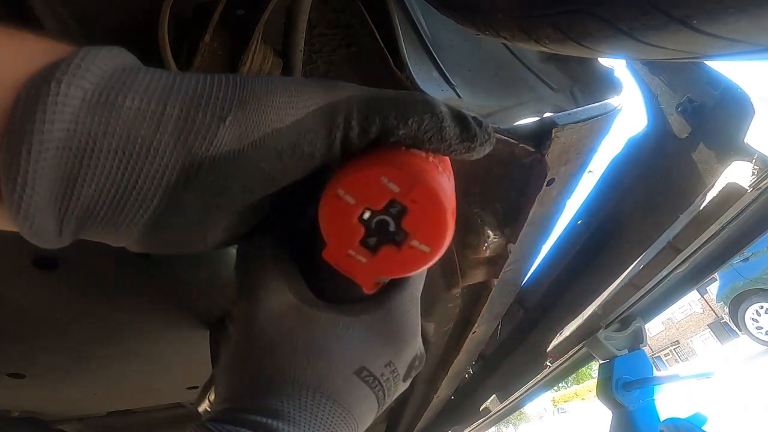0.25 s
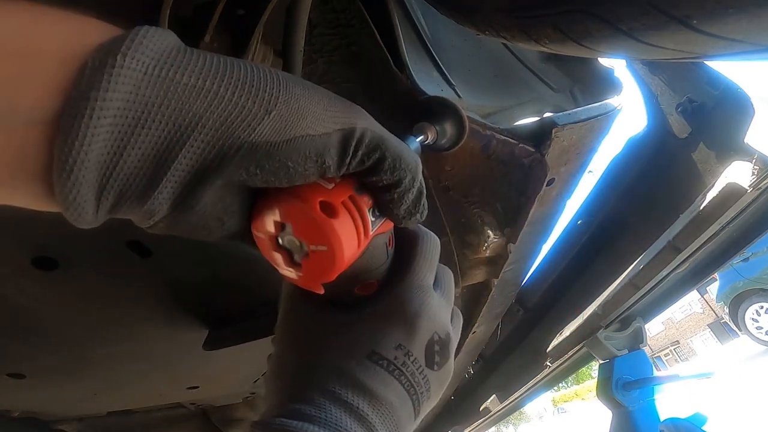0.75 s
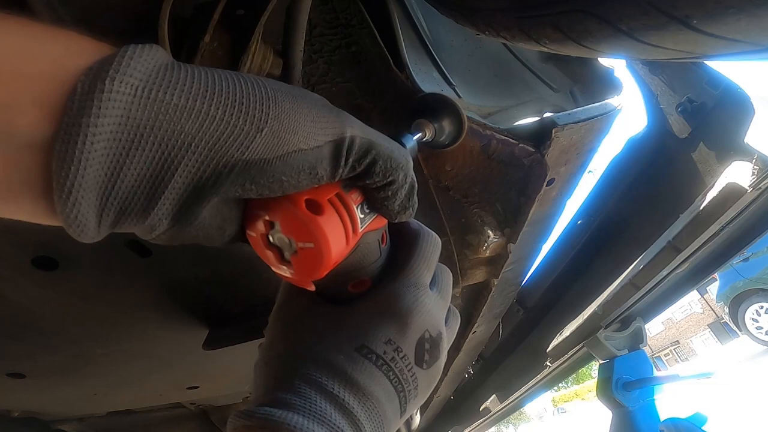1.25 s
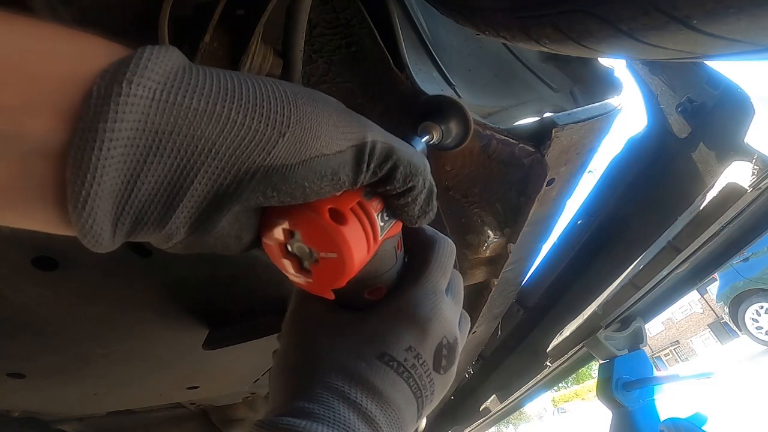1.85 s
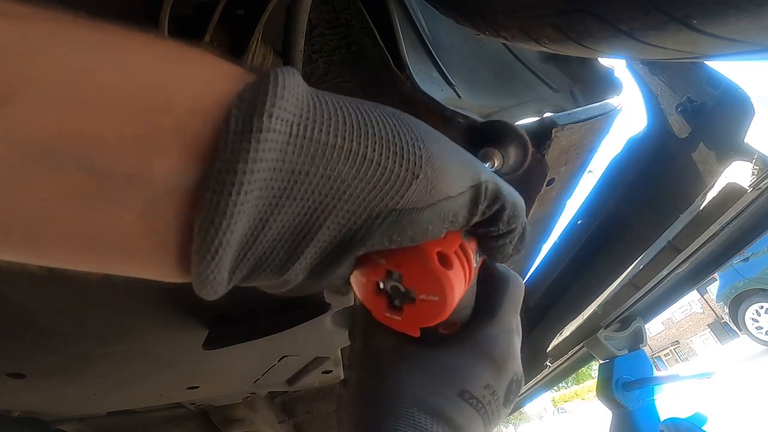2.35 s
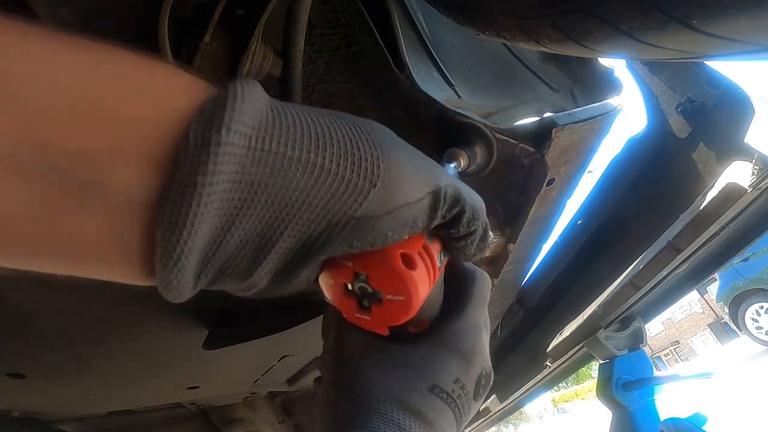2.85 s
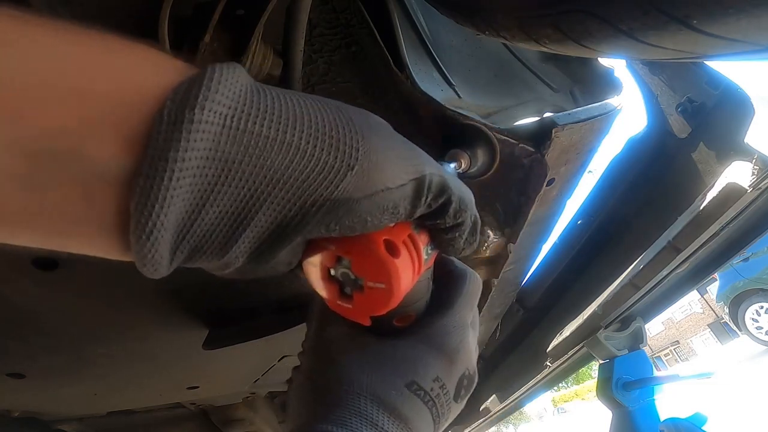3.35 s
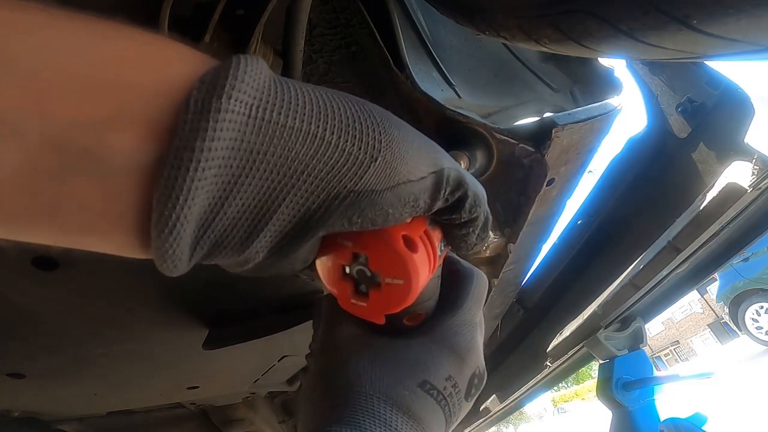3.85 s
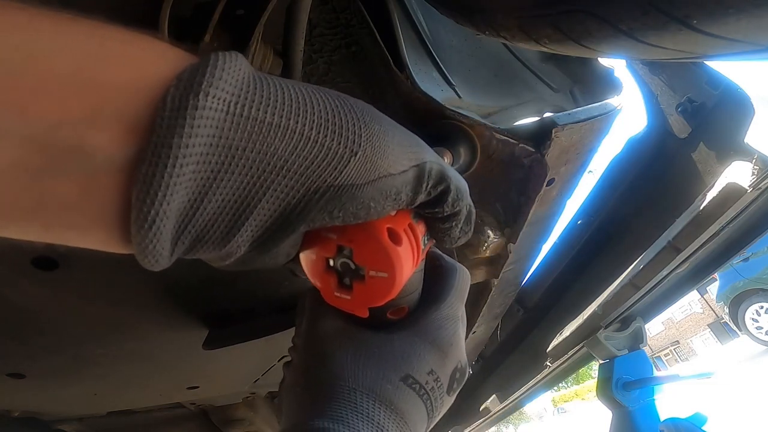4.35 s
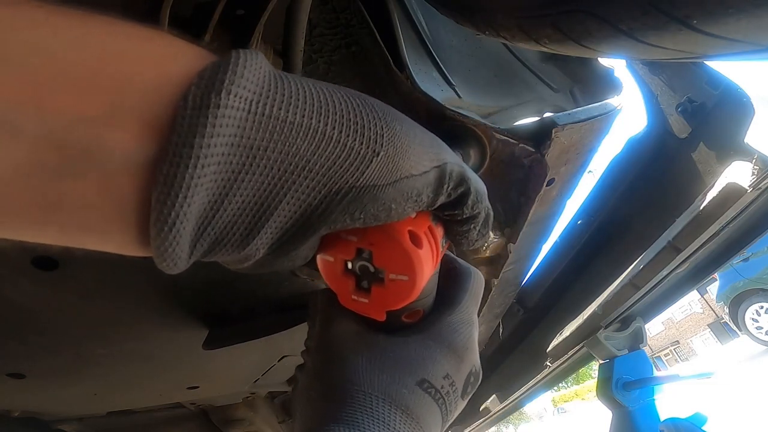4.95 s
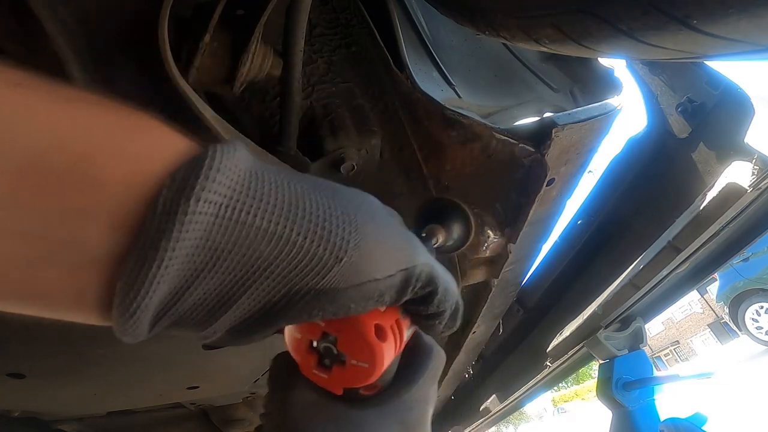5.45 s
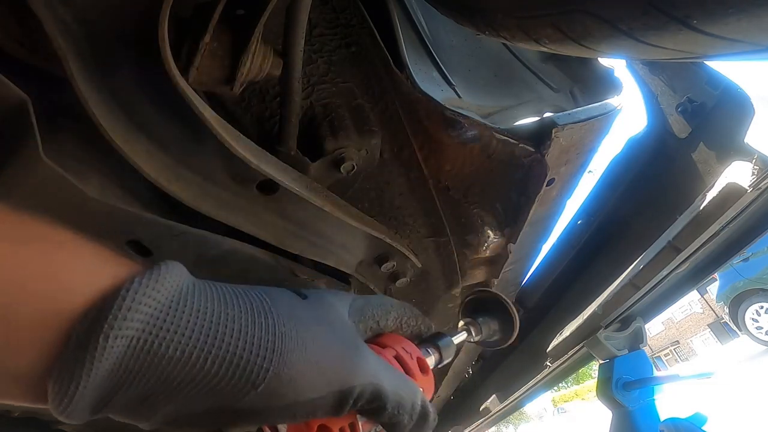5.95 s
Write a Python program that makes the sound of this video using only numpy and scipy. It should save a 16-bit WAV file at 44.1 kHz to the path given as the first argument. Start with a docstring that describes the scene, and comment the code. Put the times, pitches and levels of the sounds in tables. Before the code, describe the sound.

Heard up close in a quiet garage, a small cordless grinder strips rust from a car's steel underbody. Soft bumps from the hands come first, under a continuous rasping whine and a ringing panel. The pitch sags again and again as the pad is pressed in, bringing brief shrill squeals. Finally the tool spins down with a quick scrape and thud, followed by light metal ticks and one sharp click.

```python
"""A wavering, gritty whine: a cordless die grinder works an abrasive pad over the rusty underside of a car.
Each turn shakes the tool and forces the panel to ring at harmonics (orders) of the shaft speed, which sags
under load. Grit hisses, a bracket squeals, the motor drive whistles and hands knock, over quiet garage air.
Near the end the trigger is let go, the pad scrapes to a halt, and the tool ticks against metal."""
import sys
import numpy as np
from scipy import signal
from scipy.fft import rfft, irfft
from scipy.io import wavfile
from scipy.ndimage import uniform_filter1d, map_coordinates

SR = 44100
rng = np.random.default_rng(int(sys.argv[2]) if len(sys.argv) > 2 else 0)


def master_out(mix):
    """Clip the mix to full scale and print it as 16-bit PCM to the path in sys.argv[1]."""
    frames = np.transpose(np.atleast_2d(mix))
    ceiling = np.clip(frames, -1, 1)
    pcm = np.round(ceiling * 32767).astype(np.int16)
    wavfile.write(sys.argv[1], SR, pcm)


N = 273155
HOP = 128  # samples per control frame
T, FRAMES = np.arange(N) / SR, np.arange(N // HOP + 9) * HOP / SR
SIDES = np.array([.5, -.5])  # left and right shares of a difference between the ears
ORDERS = np.arange(1, 65)
RELEASE_S = 5.607  # the trigger is let go


def gain_of(db):
    """Amplitude ratio of a level in decibels."""
    return 10 ** (np.asarray(db) / 20)

def unit_rms(x):
    """Normalisation to unit mean power."""
    return x / np.sqrt(np.mean(abs(x) ** 2) + 1e-20)

def unit_power(gains):
    """Normalisation of each frame of orders to a total power of 1."""
    return gains / np.sqrt((gains ** 2).sum(axis=1, keepdims=True) + 1e-20)

def curve(points, t):
    """Linear interpolation in time."""
    return np.interp(t, *np.transpose(points))

def at_hz(points, hz):
    """Interpolation on a logarithmic frequency axis."""
    f, value = np.transpose(points)
    return np.interp(np.log(hz + 1), np.log(f + 1), value)

def bells(centres, widths):
    """Gaussian pulses at frame rate, one column per event; a width is a standard deviation."""
    return np.exp(-.5 * ((FRAMES[:, None] - centres) / widths) ** 2)

def drift(hz, count=1):
    """Random fluctuation: columns of low-passed noise at frame rate, rms 1."""
    b, a = signal.butter(1, hz * 2 * HOP / SR)
    slow = signal.filtfilt(b, a, rng.standard_normal((3 * len(FRAMES), count)), axis=0)
    return unit_rms(slow[len(FRAMES):2 * len(FRAMES)])

# Likeness of the two ears. Each row: frequency in Hz, coherence from 0 to 1.
COHERENCE = [(30, 0.8), (200, 0.96), (640, 0.77), (1400, 0.98), (3100, 0.71), (6800, 0.16), (15000, 0)]
# Stereo balance. Each row: frequency in Hz, left minus right in dB.
BALANCE = [(60, -1), (200, 1.5), (380, 0.5), (700, -5.5), (1290, -1), (2380, 3.5), (4400, 0), (6500, -7),
           (8500, 6), (12000, 1)]
def shaped_noise(spectrum, patchy_db):
    """Partly coherent stereo noise, rms 1, whose spectrum fluctuates in patches."""
    hz = np.fft.rfftfreq(4 * HOP, 1 / SR)
    a, b, c, d, patches = rng.standard_normal((len(FRAMES), len(hz), 5)).T
    patches = unit_rms(uniform_filter1d(uniform_filter1d(patches, size=5, axis=0), size=20, axis=1))
    coherence = np.clip(at_hz(COHERENCE, hz), 0, 1)[:, None]
    left = a + 1j * b
    right = coherence * left + np.sqrt(1 - coherence ** 2) * (c + 1j * d)
    pan_db = np.outer(SIDES, at_hz(BALANCE, hz))[..., None]
    spectra = np.array([left, right]) * gain_of(at_hz(spectrum, hz)[:, None] + patchy_db * patches + pan_db)
    return unit_rms(signal.istft(spectra, nperseg=4 * HOP, noverlap=3 * HOP)[1][:, :N])

# Garage and street ambience. Each row: frequency in Hz, relative spectral density in dB.
AIR_SPECTRUM = [(18, -34), (35, -14.5), (59, -11), (80, -22.5), (200, -28), (430, -33.5), (709, -52),
                (1550, -27), (2180, -39), (2900, -31), (6000, -39.5), (7800, -39), (8300, -62),
                (15500, -65)]
def garage_air():
    """Stationary noise: quiet air, partly correlated between the ears."""
    a, b = rng.standard_normal((2, N))
    pair = np.array([a + 0.64 * b, a - 0.4 * b])
    colour = gain_of(at_hz(AIR_SPECTRUM, np.fft.rfftfreq(N, 1 / SR)))
    return gain_of(-50.5) * unit_rms(irfft(rfft(pair) * colour, N))

# Rumble under the work. Each row: frequency in Hz, relative spectral density in dB.
RUMBLE_SPECTRUM = [(20, -50), (38, -24), (52, 0), (60, 16), (110, -7.5), (200, 1), (400, -13), (800, -41)]
def rumble():
    """Low-frequency noise that dies away when the pad stops."""
    return gain_of(-71 + stopping_db(T)) * shaped_noise(RUMBLE_SPECTRUM, patchy_db=-4)

# Knocks of the hands. Each row: peak time in seconds, level in dB, 60 dB decay time in seconds.
HAND_KNOCKS = [(.145, -28.5, .35), (.195, -29, 0.27), (.245, -46, 0.27), (.31, -41, .3),
               (.372, -30.5, 0.24), (.455, -42, 0.37), (.52, -48, .3), (.56, -39, 0.18), (1.56, -45, .3),
               (3.58, -47, 0.44), (5.67, -37, 0.43)]
# Their dull colour. Each row: frequency in Hz, relative spectral density in dB.
KNOCK_SPECTRUM = [(20, -40), (45, -9), (90, -3), (170, -1.5), (260, -7), (450, -12.5), (900, -40)]
def hand_knocks(rise_s=0.0078):
    """Damped impacts: each knock is low noise with a quick rise and an exponential decay."""
    envelope = sum(gain_of(db - 60 * np.maximum(T - s, 0) / t60) * np.clip(1 + (T - s) / rise_s, 0, 1)
                   for s, db, t60 in HAND_KNOCKS)
    return envelope * shaped_noise(KNOCK_SPECTRUM, patchy_db=-1)

def tool_jolt(start_s=5.672, hz=86, db=-28, t60=.35):
    """Damped oscillation: the tool thuds as the pad grabs and stops."""
    age = np.maximum(T - start_s, 0)
    return gain_of(db - 60 * age / t60) * np.minimum(age / 0.009, 1) * np.sin(2 * np.pi * hz * age)

# Taps of the tool. Each row: start in seconds, peak in dB before panning, favoured frequency in Hz,
# left minus right in dB.
TAPS = [(5.666, -19, 2400, 0), (5.702, -18, 2204, -5), (5.848, -44, 2625, 2), (5.875, -43, 2778, 11),
        (5.989, -38.5, 2400, 3), (6.0714, -39.5, 1590, 4), (6.144, -12.5, 3320, 2.5)]
# Modes of the steel. Each row: frequency in Hz, relative level in dB, 60 dB decay time in seconds.
STEEL_MODES = [(1451, 22.5, 0.014), (2024, 10, 0.023), (3116, 16.5, 0.0081), (4500, 0, 0.012),
               (4860, 4, 0.021), (5870, 4, 0.0094), (6360, -13, 0.0075), (7060, 6, 0.031),
               (8400, -23, .012), (10400, -19, .01)]
def steel_ticks():
    """Modal ringing: a short rattle of steel on steel excites the modes, and the car's underside echoes."""
    out, t = np.zeros((2, N + SR)), np.arange(SR // 8) / SR
    for s, db, bright_hz, pan_db in TAPS:
        modes = sum(gain_of(mode_db - 60 * t / t60 - 10 * np.log2(f / bright_hz) ** 2)
                    * np.sin(2 * np.pi * f * t) for f, mode_db, t60 in STEEL_MODES)
        near, left, right = rng.standard_normal((3, len(t)))
        rattle = near * t / 0.0014 * np.exp(-t / 0.002)
        echo = gain_of(-3.5 - 60 * t / 0.053) * np.minimum(t / 0.00096, 1) * np.array([left, right])
        excitation = np.gradient(rattle + echo, axis=1)  # small parts radiate no bass
        tick = signal.fftconvolve(modes[None], excitation, axes=1)
        at = round(s * SR)
        out[:, at:at + tick.shape[1]] += gain_of(db + pan_db * SIDES[:, None]) * tick / abs(tick).max()
    return out[:, :N]

# Last bites of the pad. Each row: start and length in seconds, level in dB, first and last pitch in Hz.
LAST_BITES = [(5.664, 0.00942, -21, 4500, 1775), (5.697, 0.011, -28.5, 3000, 1535)]
def stopping_scrapes():
    """Sliding friction: bursts of bright grit, with a squeak that falls as the pad slows."""
    out = np.zeros((2, N))
    noise = shaped_noise([(500, -25), (2000, -4), (7000, 0), (9000, -16), (15000, -24)], patchy_db=3)
    for s, length, db, from_hz, to_hz in LAST_BITES:
        progress = np.maximum((T - s) / length, 0)
        envelope = np.clip(progress * 8, 0, 1) * np.exp(-np.maximum(progress - 1, 0) * 1.9)
        hz = from_hz * (to_hz / from_hz) ** np.minimum(progress, 1)
        squeak = np.sin(2 * np.pi * np.cumsum(hz) / SR) * (progress < 1)
        out += gain_of(db) * envelope * (noise + 0.3 * squeak)
    return out

# Tones of the drive. Each row: multiple of the switching rate, offset in shaft orders,
# relative level in dB, left minus right in dB.
DRIVE_TONES = [(1, -4, 0, -3), (1, 0, -17, 4), (1, 4, -11, 10), (1, -8, -12, 0), (2, -4, -35, 2)]
# Course of the first tone. Each row: time in seconds, level in dB.
FIRST_TONE_LEVEL = [(0, -31), (.25, -38.5), (.6, -35), (.81, -25.5), (1.05, -33), (1.3, -53), (1.45, -36),
                    (1.6, -39.5), (2.13, -28.5), (2.35, -32), (2.6, -30.5), (3.25, -35), (3.4, -32.5),
                    (4.2, -33), (5.33, -37), (5.59, -28)]
def drive_whistle(angle, switch_hz=7708):
    """Modulation sidebands: the turning poles split the switching tone, until the trigger is let go."""
    out, flicker = np.zeros((2, N)), drift(5.3, len(DRIVE_TONES))
    others_db = np.interp(T, [0, 1.5, 3.5, 5.5], [-37.5, -33.5, -34.0, -38.5])
    for j, (multiple, offset, db, pan_db) in enumerate(DRIVE_TONES):
        flicker_db = 3.7 * np.interp(T, FRAMES, flicker[:, j])
        level_db = curve(FIRST_TONE_LEVEL, T) if j == 0 else others_db + flicker_db
        phase = 2 * np.pi * multiple * switch_hz * T + offset * angle + 1.1 * SIDES[:, None]
        out += gain_of(level_db + db + pan_db * SIDES[:, None]) * np.sqrt(2) * np.cos(phase)
    return out * np.clip((RELEASE_S - T) / 0.002, 0, 1)

# Catches on rust. Each row: time and width in seconds, relative level in dB, added share of loose grit.
RUST_CATCHES = [(0.195, 0.028, -47, 0.5), (0.28, 0.036, -41, 0.38), (1.062, 0.029, -37, 0.2),
                (1.245, .012, -41, 0.1), (1.542, 0.022, -37.5, 0.28), (1.893, 0.087, -52, 0.17),
                (2.122, 0.023, -47, 0.13), (2.49, 0.012, -60, 0), (2.622, 0.018, -60, 0.05),
                (2.965, 0.037, -45, 0.32), (3.165, 0.013, -56, 0.25), (3.224, 0.01, -58, 0),
                (3.565, 0.016, -45, 0.22), (3.959, .05, -53, 0.08), (4.179, 0.048, -63, 0.01),
                (5.329, 0.038, -51, 0.08), (5.557, 0.081, -47, 0), (5.703, 0.027, -38.5, 0.3)]
# Colour of the scuffing. Each row: frequency in Hz, relative spectral density in dB.
SCUFF_SPECTRUM = [(100, 0), (200, 5), (400, 16), (700, 13.5), (1200, 27.5), (2000, 7), (4000, -36)]
def pad_scuffs():
    """Friction noise that swells wherever the pad catches on rough rust."""
    s, width, db, _ = np.transpose(RUST_CATCHES)
    envelope = gain_of(-54.5) * (FRAMES < RELEASE_S) + bells(s, width) @ gain_of(db)
    return gain_of(9) * np.interp(T, FRAMES, envelope) * shaped_noise(SCUFF_SPECTRUM, patchy_db=2.5)

# Shaft speed between presses, then the run-down. Each row: time in seconds, rotation rate in Hz.
BASE_SPEED = [(0.0, 157.3), (0.158, 187.3), (0.35, 172.5), (0.85, 165.9), (1.197, 171.4), (1.73, 169.8),
              (2.27, 165.3), (2.57, 176.4), (2.82, 169.3), (3.087, 166.5), (3.47, 182.4), (4.07, 183.1),
              (4.57, 192.3), (5.021, 189.8), (5.268, 162.2), (5.321, 193.2), (5.47, 187.5), (5.58, 153.3),
              (5.7, 111.3), (5.764, 67.75), (5.86, 55.2)]
# The hands press the pad in. Each row: time in seconds, speed lost in Hz, width in seconds,
# squeal boost in dB, squeal pitch in Hz.
HAND_PRESSES = [(0.212, 18.1, 0.062, -1, 3630), (0.937, 9.4, 0.034, 6, 3560.0),
                (1.09, 12.3, 0.043, 7.5, 3610.0), (1.327, 15.1, 0.059, 9, 3703),
                (1.583, 10, 0.045, 2, 3650), (1.992, 3, 0.046, -13, 3780.0), (2.368, 8.7, 0.035, 0, 3930),
                (2.517, 20, 0.027, 10, 3826), (2.669, 23, 0.032, 10.5, 3865), (2.989, 7.3, 0.027, 7, 3870),
                (3.191, 33.8, 0.026, 18, 3940), (3.342, 20.4, 0.032, 8, 3800),
                (3.438, 17.6, 0.037, 9, 3772), (3.592, 46.6, 0.024, 15.5, 3860.0),
                (3.687, 23.8, 0.027, 7, 3790), (3.811, 33.4, 0.024, 8, 4240.0), (3.96, 28, 0.026, 0, 3850),
                (4.047, 39, 0.028, 10, 4030), (4.195, 43.4, 0.022, 10, 3985), (4.295, 28.7, 0.035, 4, 3830),
                (4.425, 39.7, 0.038, 5, 4208), (4.553, 30.2, 0.038, 3, 3840.0),
                (4.661, 37.5, 0.046, 5, 3700.0), (4.786, 32, 0.039, 6, 3740), (4.9, 27, 0.053, 0.5, 3770.0),
                (5.022, 36.7, 0.034, 4, 4233), (5.163, 14.9, 0.049, -5, 3823), (5.387, 5.6, 0.014, 2, 3774)]
# The pad skips free. Each row: time in seconds, speed gained in Hz, width in seconds.
PAD_SKIPS = [(0.415, 2.1, 0.03), (1.213, 2.04, 0.021), (1.862, 2.33, .014), (2.084, 6, 0.022),
             (2.813, 4, 0.026), (3.267, 4, 0.012), (5.338, 3.94, 0.016)]
def shaft_hz(t):
    """Rotation under load: the shaft slows with each press and gains with each skip."""
    press_s, lost, press_width = np.transpose(HAND_PRESSES)[:3]
    skip_s, gained, skip_width = np.transpose(PAD_SKIPS)
    change = bells(skip_s, skip_width) @ gained - bells(press_s, press_width) @ lost
    return curve(BASE_SPEED, t) + np.interp(t, FRAMES, change)

def surge_hz():
    """Deviation of the shaft speed from its running mean, at frame rate."""
    return shaft_hz(FRAMES) - uniform_filter1d(shaft_hz(FRAMES), size=60)

def bogging_gain(db_per_hz=0.2):
    """Abrasion weakens with speed: rasp and grit duck as the shaft bogs down."""
    return gain_of(db_per_hz * np.minimum(surge_hz(), 0))

# Chatter of the bracket between squeals. Each row: time in seconds, level in dB, pitch in Hz.
BRACKET_CHATTER = [(0, -32, 3660), (.3, -32.5, 3650), (0.848, -37, 3660), (.95, -30, 3640),
                   (1.2, -35, 3680), (1.45, -31.5, 3700), (1.75, -29, 3720), (2.05, -32, 3760),
                   (2.25, -34, 3700), (2.5, -36.5, 3840), (3.6, -35, 3790), (4.4, -32, 3707),
                   (4.85, -32, 3733), (5.25, -25.5, 3815), (5.33, -37, 3815)]
# Its pitch roams more as the hands work harder. Each row: time in seconds, rms deviation in Hz.
BRACKET_ROAM = [(0, 30), (2.0, 40), (3.3, 140), (5.3, 170)]
def bracket_squeal(angle, half_band_hz=150, flicker_db=3, most_tone=.93):
    """Narrow-band resonance: a bracket, kicked on every turn, squeals at the deepest point of a press."""
    s, _, width, squeal_db, squeal_hz = np.transpose(HAND_PRESSES)
    bed_s, bed_db, bed_hz = np.transpose(BRACKET_CHATTER)
    presses = bells(s, .6 * width)
    pressed = presses.sum(axis=1)
    hz = np.interp(FRAMES, bed_s, bed_hz)
    hz += np.minimum(2 * presses ** 2, 1) @ (squeal_hz - np.interp(s, bed_s, bed_hz))
    hz += curve(BRACKET_ROAM, FRAMES) * (1 - np.minimum(2 * pressed, 1)) * drift(9)[:, 0]
    level_db = np.interp(FRAMES, bed_s, bed_db) + np.minimum(1.02 * presses, 1) @ squeal_db
    level_db += flicker_db * (1 - np.minimum(pressed, 1)) * drift(26)[:, 0]
    level_db -= 300 * np.maximum(FRAMES - RELEASE_S, 0)
    noise = rng.standard_normal((2, N, 2)) @ [1, 1j]
    b, a = signal.butter(2, half_band_hz * 2 / SR)
    rough = unit_rms(signal.lfilter(b, a, noise + 0.12 * noise[::-1]))
    squealing = np.minimum(0.86 * presses, 1) @ np.clip(squeal_db / 20, 0, 1)
    tone_share = most_tone * np.interp(T, FRAMES, squealing)
    envelope = np.sqrt(tone_share) + np.sqrt(1 - tone_share) * rough * (1 + 0.86 * np.cos(angle))
    carrier = np.exp(2j * np.pi * np.cumsum(np.interp(T, FRAMES, hz)) / SR)
    return gain_of(np.interp(T, FRAMES, level_db) + 8.4 * SIDES[:, None]) * (envelope * carrier).real

# Strength of the grinding. Each row: time in seconds, then base levels in dB of the unbalance tone,
# tool body, low panel mode, high panel mode and abrasion (rasp and grit).
WORK_LEVELS = [(0.0, -33.5, -31.5, -25.5, -39, -20.5), (0.2, -25.5, -36.5, -37, -19.5, -23),
               (0.55, -25.5, -36, -25.5, -22.5, -23.5), (0.81, -35, -41, -27, -21.5, -23.5),
               (1.0, -26.5, -37, -23.5, -35, -22), (1.23, -29.5, -37, -26.5, -20.5, -21.5),
               (1.33, -27.5, -41, -36, -26.5, -21.5), (1.41, -25, -35.5, -26, -28, -21.5),
               (1.5, -27, -38, -24.5, -27, -21), (1.8, -24.5, -36.5, -24, -30, -22),
               (2.3, -27, -37.5, -20.5, -30, -22), (2.8, -26.5, -37.5, -23.5, -26, -22),
               (3.3, -27.5, -37, -25, -27.5, -22.5), (3.55, -27, -37.5, -25, -26.5, -22),
               (4.0, -26.5, -37, -27, -26.5, -21.5), (4.8, -26.5, -37.5, -24.5, -26, -21.5),
               (5.2, -27.5, -38.5, -29, -24.5, -21.5), (5.35, -24.5, -40, -24, -22.5, -21.5),
               (5.59, -29.5, -42.5, -31, -25.5, -24), (5.707, -39, -42, -32, -44, -28),
               (5.742, -39, -55, -56, -62, -41.5), (5.777, -49, -66, -63, -66, -45.5),
               (5.857, -55, -74, -72, -78, -53)]
def work_gains(t):
    """Amplitude envelopes of the five parts of the grinding, in table order."""
    when, *levels_db = np.transpose(WORK_LEVELS)
    return np.array([gain_of(np.interp(t, when, db) + stopping_db(t)) for db in levels_db])

def stopping_db(t):
    """Exponential decay, 200 dB a second, once the pad stands still."""
    return -200 * np.maximum(t - WORK_LEVELS[-1][0], 0)

# The pad rides light. Each row: time in seconds, lightness from 0 to 1.
LIGHT_CONTACT = [(.28, 0.3), (.33, 0.4), (.6, 0.7), (.85, 0.85), (.92, 0.04), (5.3, 0.01), (5.39, 1),
                 (5.5, 0.89), (5.62, 0.81), (5.72, 0)]
def singing_tool(hz):
    """Resonance of the tool near 1500 Hz, heard while the pad rides light."""
    level = curve(LIGHT_CONTACT, FRAMES) * gain_of(-29 + stopping_db(FRAMES))
    return level[:, None] * resonance(hz, 1502, 140)

# Loose grit between catches. Each row: time in seconds, share of the abrasion from 0 to 1.
GRIT_SHARE = [(0, .13), (.35, .055), (.85, .05), (.95, .09), (2.05, .07), (2.3, .05), (2.5, .09),
              (5.3, .11)]
def loose_share(t):
    """Division of power: the noisy share of the abrasion grows in catches and as load slows the shaft."""
    s, width, _, share = np.transpose(RUST_CATCHES)
    caught = np.interp(t, FRAMES, bells(s, width) @ share)
    dragged = 0.002 * (166 - shaft_hz(t))
    return np.clip(curve(GRIT_SHARE, t) - 0.0077 * curve(LIGHT_CONTACT, t) + caught + dragged, .02, .95)

# Hiss of loose grit. Each row: frequency in Hz, relative spectral density in dB.
GRIT_SPECTRUM = [(500, -30), (1200, -9.5), (2000, -8), (3000, -7.5), (4000, -15.5), (5500, -11),
                 (6800, -21), (7500, -35), (8200, -18.5), (9300, -39.5), (12000, -27.5), (15500, -43)]
def grit_hiss(angle):
    """Amplitude-modulated noise: the hiss peaks as the high side of the pad bites on each turn."""
    bite = unit_rms(np.exp(0.28 * np.cos(angle) + 0.076 * np.cos(2 * angle)))
    level = work_gains(T)[-1] * np.sqrt(loose_share(T)) * np.interp(T, FRAMES, bogging_gain())
    return level * bite * shaped_noise(GRIT_SPECTRUM, patchy_db=4)

def resonance(hz, centre_hz, half_width_hz):
    """Lorentzian response of one mode, 1 at its centre."""
    return 1 / (1 + ((hz - centre_hz) / half_width_hz) ** 2)

def panel_colour(hz, depth, rate_hz, band_hz=130):
    """Random response of sheet metal: narrow bands stay put in pitch and vary as the pad travels."""
    frame = np.arange(len(FRAMES))[:, None] + np.zeros_like(hz)
    return depth * map_coordinates(drift(rate_hz, 100), [frame, hz / band_hz], order=1, mode="nearest")

# Vibration of the tool body. Each entry: relative level in dB, for orders 2 to 6.
BODY_LEVELS = [2.5, 4.4, 0, 0, -2]
# Speed dependence of orders 1 to 6. Each row: slope above and slope below the dull speed, in dB per Hz.
ORDER_SLOPES = [(0.088, 0.25), (0.091, 0.2), (0.63, 0.37), (0.83, -0), (1, 0.7), (1, 0.6)]
def tool_vibration(hz, wander, unbalance_gain, body_gain, dull_hz=150.9, reach_hz=17.6):
    """Rotating unbalance shakes the tool; its low orders are weakest at one speed and grow away from it."""
    body = np.zeros(len(ORDERS))
    body[1:6] = gain_of(BODY_LEVELS)
    above, below = np.pad(np.transpose(ORDER_SLOPES), [(0, 0), (0, len(ORDERS) - len(ORDER_SLOPES))])
    away_hz = np.clip(hz[:, :1] - dull_hz, -reach_hz, reach_hz)
    growth_db = above * (np.maximum(away_hz, 0) - reach_hz / 2) - below * np.minimum(away_hz, 0)
    flutter = gain_of(drift(14) + .35 * drift(30))
    unbalance = unbalance_gain * (ORDERS == 1) * flutter
    return gain_of(growth_db) * (unbalance + body_gain * unit_power(body * wander))

# Rasp that repeats each turn. Each row: frequency in Hz, relative level in dB.
RASP_SPECTRUM = [(500, -30), (900, -5), (1700, -2.5), (2200, -0.5), (2800, 1.5), (3400, 1.5), (4300, -2),
                 (5500, -4.5), (6700, -8), (7400, -9.5), (8100, -25.5), (11000, -43)]
# Bands that the braced panel lifts or dulls. Each row: centre and half-width in Hz.
BRACE_BANDS = [(1750, 37), (2900, 570), (3330, 32), (3800, 35), (4230, 52), (4550, 77)]
# Their course. Each row: time in seconds, then the gain of each band in dB.
BRACE_GAINS = [(0, -3, -1, 7, 2, 1, -3), (.6, -17, -1, 8, 13, 0, -7), (.9, -7, -2, 5, 6.4, -17, 7),
               (1.2, 6, -3.5, -2, 5.9, -4, 4), (1.45, 5, -1.5, 9, 4, -10, 8), (1.8, 4, 4.5, 16, 4, -7, 8),
               (2.2, -1, -5.5, 4, 5.76, -1, -1), (2.5, 8, 0.5, -7, 3, 0, -2), (3.4, 3, -1.5, 3, 4.16, 5, 7),
               (4.4, -4, 0, -0.5, 1.96, -3, 0), (4.9, -3, -2, -1, 2.55, 5, 7),
               (5.3, -4, 0.5, -5, 4.2, 2, 4)]
# A higher panel ring that moves with the pad. Each row: time in seconds, centre in Hz, gain in dB.
MOVING_RING = [(0, 2300, -10), (.85, 2690, 9), (1.75, 2650, -2), (2.1, 2530, -20), (2.27, 1914, 6),
               (2.371, 2050, 16), (2.45, 2220, 8), (3.5, 2322, 4), (4.3, 2130, 2), (4.7, 2039, 7.5),
               (5.2, 2115, 9), (5.45, 2250, 8.5), (5.701, 2301, 5)]
def pad_rasp(hz):
    """Source and filter: resonances of the panel colour the pad's rasp, from order 6 up."""
    when, *bands_db = np.transpose(BRACE_GAINS)
    brace_db = sum(np.interp(FRAMES, when, db)[:, None] * resonance(hz, *band)
                   for band, db in zip(BRACE_BANDS, bands_db))
    when, *columns = np.transpose(MOVING_RING)
    ring_hz, peak_db = (np.interp(FRAMES, when, column)[:, None] for column in columns)
    surge = surge_hz()[:, None]  # the ring climbs and swells as the pad lets go
    ring_db = (peak_db + 0.2 * surge) * resonance(hz, ring_hz + 13 * surge, 99)
    return gain_of(at_hz(RASP_SPECTRUM, hz) + brace_db + ring_db) * (ORDERS > 5)

def order_phases(blur_hz=70, most_rms_rad=1.6):
    """Phase modulation: the upper harmonics blur and roughen, most while the pitch is sliding down."""
    phase = -0.22 * ORDERS ** 2  # each bite is a quick upward chirp
    phase = phase + 0.06 * ORDERS * drift(2.5, len(ORDERS))  # the contact slowly changes shape
    phase += 0.005 * ORDERS * drift(40)
    acceleration = np.gradient(shaft_hz(FRAMES), FRAMES)
    swing = uniform_filter1d(np.maximum(-acceleration, .4 * acceleration), size=7)
    blur = .7 * loose_share(FRAMES) + 0.001 * swing
    depth = (np.maximum(ORDERS - 6, 0) / 10) ** 2.38 * blur[:, None]
    return phase + np.minimum(depth, most_rms_rad) * drift(blur_hz, len(ORDERS))

# The low and high modes of the panel. Each row: centre and half-width in Hz.
PANEL_RESONANCES = [(1180, 58), (1410, 38)]
def order_amplitudes(hz):
    """Forced vibration: a panel mode sings when an order falls on it, joining the rasp and the tool."""
    unbalance, body, low_gain, high_gain, abrasion = work_gains(FRAMES)[..., None]
    wander_db = np.interp(ORDERS, [1, 6, 14, 24, 32], [1.3, 2.0, 3.8, 3.4, 3.2])
    wander = gain_of(panel_colour(hz, wander_db, rate_hz=9))
    tool = singing_tool(hz) * wander + tool_vibration(hz, wander, unbalance, body)
    low, high = ((ORDERS > 5) * np.sqrt(wander) * resonance(hz, *mode) for mode in PANEL_RESONANCES)
    periodic = bogging_gain() * np.sqrt(1 - loose_share(FRAMES))
    rasp = abrasion * periodic[:, None] * unit_power(pad_rasp(hz) * wander)
    return tool + np.hypot(np.hypot(low_gain * low, high_gain * high), rasp)

def grinding_whine(angle):
    """Fourier series: all that repeats on every turn is a sum of harmonics of the shaft angle."""
    hz = shaft_hz(FRAMES)[:, None] * ORDERS
    amplitude, phase = order_amplitudes(hz), order_phases()
    spread = np.sqrt(-2 * np.log(np.clip(at_hz(COHERENCE, hz), .02, 1)))  # radians between the ears
    lead = panel_colour(hz, spread, rate_hz=1.3) - 2 * np.pi * hz * 2 / SR  # left lags by two samples
    pan_db = at_hz(BALANCE, hz) + panel_colour(hz, 6.7 * spread, rate_hz=3.3)
    out, turn, harmonic = np.zeros((2, N)), np.exp(1j * angle), np.sqrt(2)
    for j in range(len(ORDERS)):
        harmonic = harmonic * turn
        for ear, side in enumerate(SIDES):
            level = amplitude[:, j] * gain_of(side * pan_db[:, j])
            phasor = level * np.exp(1j * (phase[:, j] + side * lead[:, j]))
            out[ear] += (np.interp(T, FRAMES, phasor) * harmonic).real
    return out

def scene():
    """Superposition of all sources; one shaft angle ties the grinder's sounds together."""
    angle = 2 * np.pi * np.cumsum(shaft_hz(T)) / SR
    grinder = grinding_whine(angle) + grit_hiss(angle) + bracket_squeal(angle) + drive_whistle(angle)
    handling = pad_scuffs() + hand_knocks() + rumble()
    halt = stopping_scrapes() + tool_jolt() + steel_ticks()
    return grinder + handling + halt + garage_air()

def record(dry):
    """Band limiting: a bass cut at 44 Hz and a steep treble cut at 15650 Hz."""
    bass_cut = signal.sosfilt(signal.butter(4, 44, "highpass", fs=SR, output="sos"), dry)
    lowpass = signal.firwin(2047, 15650, window=("kaiser", 9), fs=SR)
    return signal.oaconvolve(bass_cut, lowpass[None], "same")


dry = scene()
out = record(dry)
master_out(out)
```